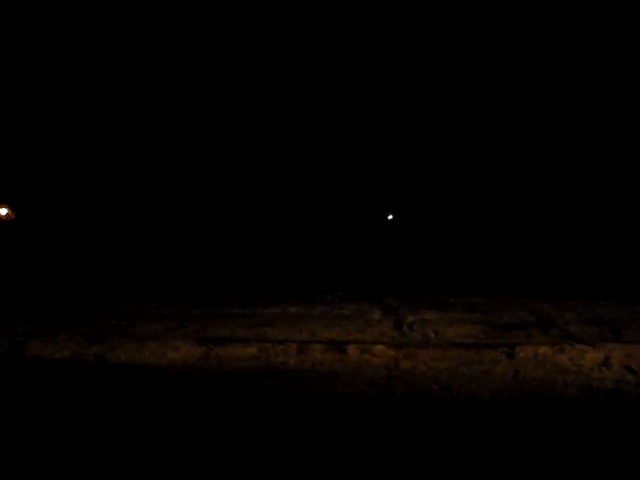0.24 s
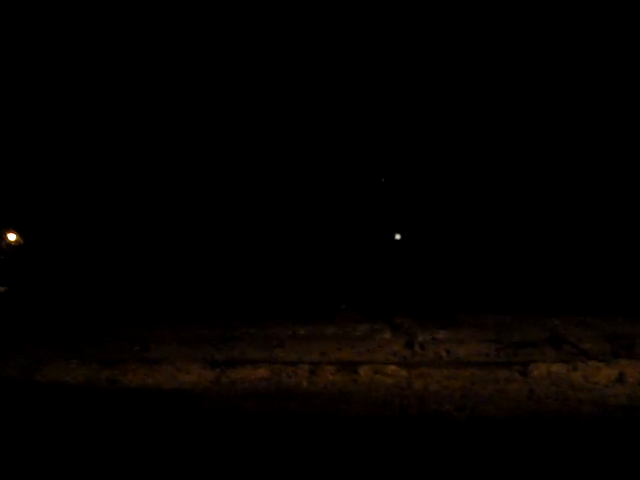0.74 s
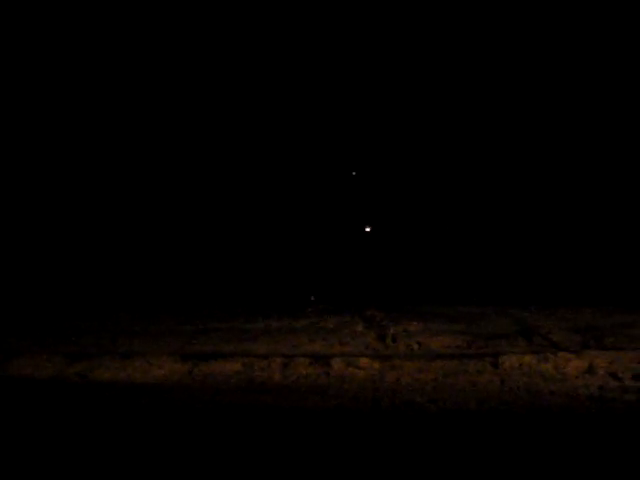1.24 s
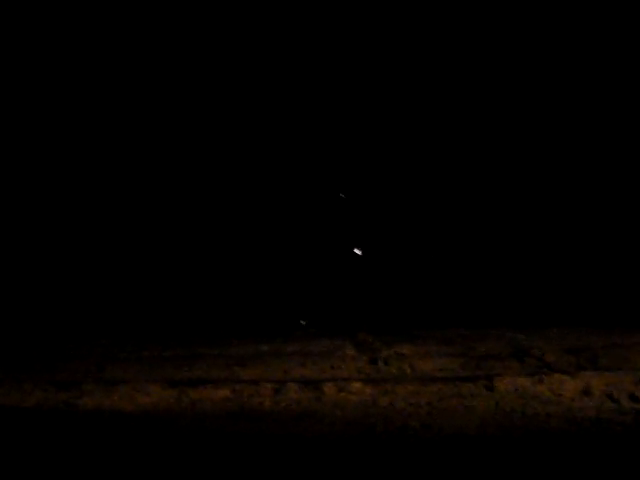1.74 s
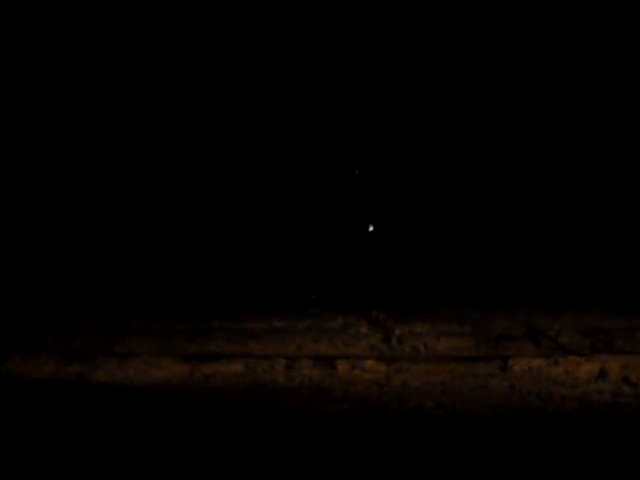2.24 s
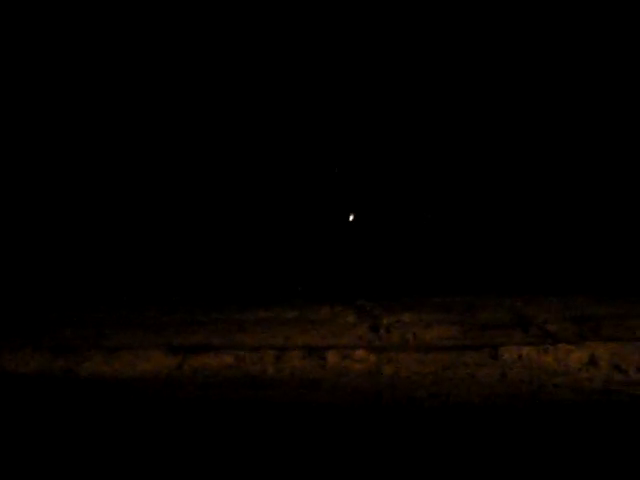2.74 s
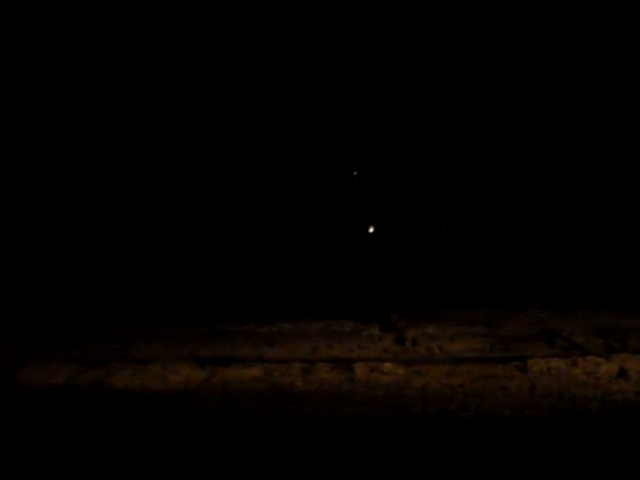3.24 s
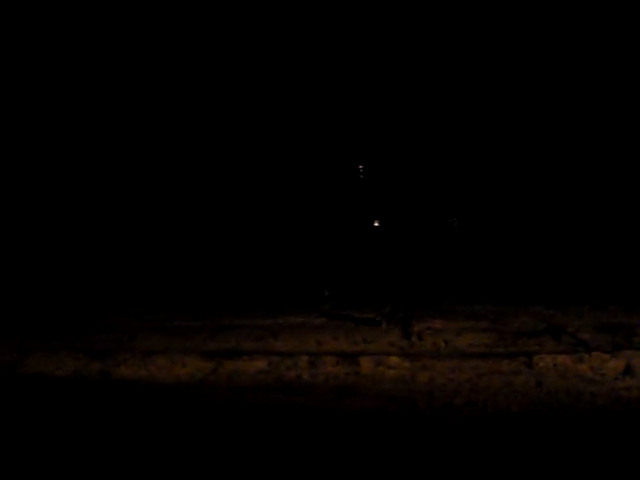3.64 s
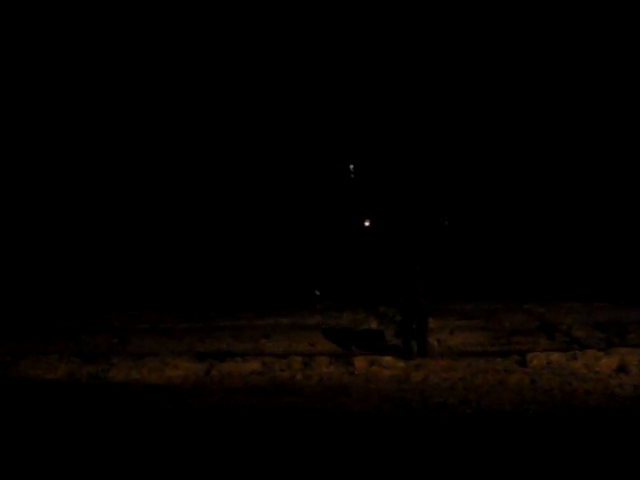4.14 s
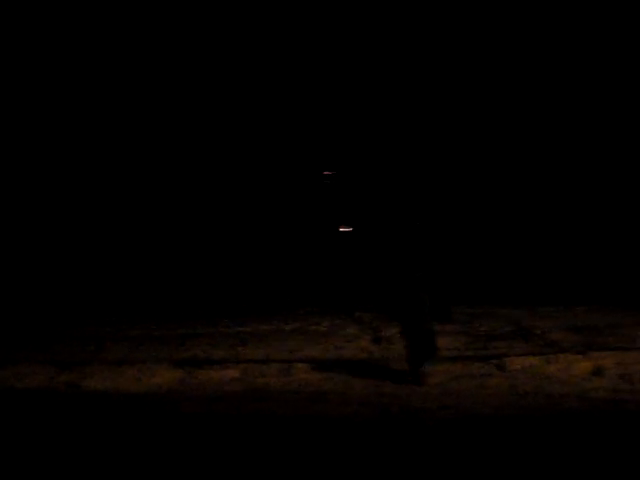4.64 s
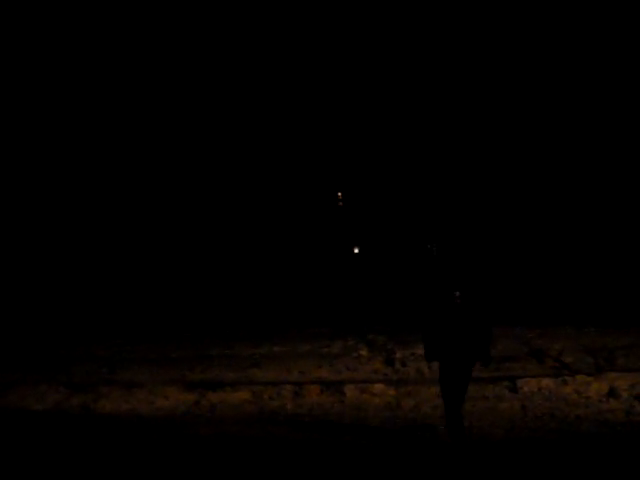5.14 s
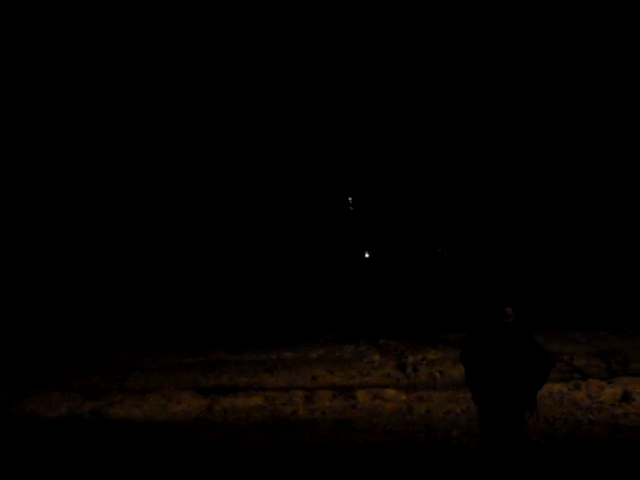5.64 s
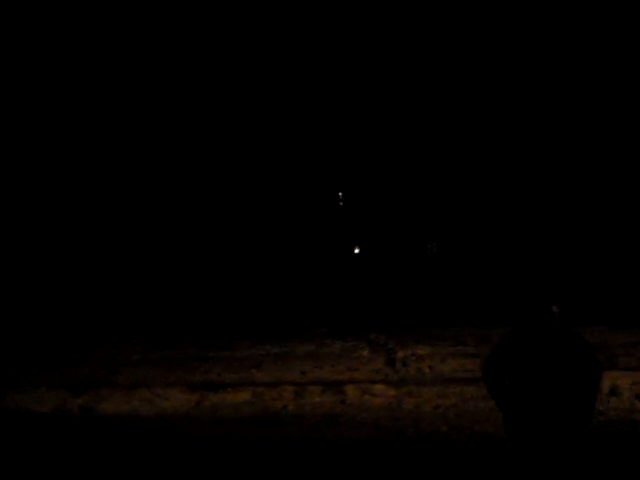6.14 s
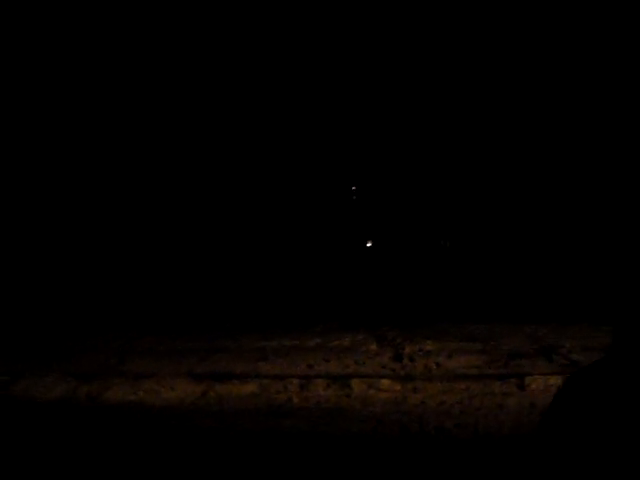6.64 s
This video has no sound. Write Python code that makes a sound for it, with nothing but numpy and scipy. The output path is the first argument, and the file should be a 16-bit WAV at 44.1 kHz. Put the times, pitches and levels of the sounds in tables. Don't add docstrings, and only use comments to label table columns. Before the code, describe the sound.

Five firework bangs roll between walls at night, with whooshing launches, faint insects, and someone's gritty footsteps coming closer.

```python
import sys
import numpy as np
from scipy import signal
from scipy.fft import rfft, irfft, next_fast_len
from scipy.io import wavfile
from scipy.ndimage import uniform_filter1d, minimum_filter1d

SR = 44100
rng = np.random.default_rng(int(sys.argv[2]) if len(sys.argv) > 2 else 0)


def generate_wav(signal):
    frames = np.transpose(np.atleast_2d(signal))
    scaled = np.clip(frames, -1, 1) * 32767
    pcm = np.round(scaled).astype(np.int16)
    wavfile.write(sys.argv[1], SR, pcm)


def makeup_ratio(level_db):
    decades = np.asarray(level_db, float) / 20
    return 10 ** decades


N = 303620


def rms_one(x):
    return x / np.sqrt(np.mean(x ** 2) + 1e-20)


def colour(x, spectrum):
    size = next_fast_len(N + 8192)
    hz, level_db = np.transpose(spectrum)
    log_hz = np.log(np.fft.rfftfreq(size, 1 / SR) + 1)
    log_gain = np.interp(log_hz, np.log(hz), level_db) * np.log(10) / 20
    cepstrum = irfft(log_gain, size)
    cepstrum[1:size // 2] *= 2
    cepstrum[size // 2 + 1:] = 0
    response = np.exp(rfft(cepstrum))
    return rms_one(irfft(rfft(x, size) * response, size)[:N])


def band(x, low_hz, high_hz):
    return signal.sosfilt(signal.butter(2, [low_hz, high_hz], "band", fs=SR, output="sos"), x + 1e-18)


def lowpass(x, top_hz):
    return signal.sosfilt(signal.butter(6, top_hz, fs=SR, output="sos"), x)


def narrow(hz, width_hz):
    return rms_one(band(rng.standard_normal(N), hz - width_hz / 2, hz + width_hz / 2))


def drift(rate_hz):
    r = np.exp(-2 * np.pi * rate_hz / SR)
    return rms_one(signal.lfilter([1], [1, -2 * r, r * r], rng.standard_normal(N + SR))[SR:])


def grains(per_s, spread_db):
    sizes = makeup_ratio(spread_db * np.minimum(rng.exponential(1, N), 4)) * rng.choice([-1, 1], N)
    return sizes * (rng.random(N) < per_s / SR)


def add(out, s, sound):
    at = int(s * SR)
    out[at:at + len(sound)] += sound[:N - at]


def thump(hz, t60, rise_s, order=1):
    t = np.arange(6000) / SR
    swell = (1 - np.exp(-t / rise_s)) ** 2
    wave = -np.sin(2 * np.pi * hz * t) * swell * makeup_ratio(-60 * (t / t60) ** order)
    wave = band(wave, hz / 4, min(hz * 5, 9000))
    return wave / np.abs(wave).max()


def swells(rows, floor_db=-120):
    t = np.arange(0, N + 32, 32) / SR
    s, level_db, rise, fall = (c[:, None] for c in np.transpose(rows))
    away = np.where(t < s, (s - t) / np.abs(rise), (t - s) / np.abs(fall))
    power = np.sum(makeup_ratio(level_db - 20 * away) ** 2, axis=0) + makeup_ratio(floor_db) ** 2
    return np.interp(np.arange(N) / SR, t, np.sqrt(power))


# (frequency [Hz], density [dB per Hz])
AIR_SPECTRUM = [(15, -50), (25, -25), (93, -24.5), (225, 5), (600, -2.5), (1400, -6), (2300, -12),
                (4100, -17), (7700, -19), (9600, -24.5), (10300, -41.5), (13500, -76)]
# (frequency [Hz], width [Hz], level [dB])
MACHINERY = [(63, 32, -67.5), (126.5, 31, -59)]


def town():
    air = makeup_ratio(-48 + .9 * drift(24)) * colour(rng.standard_normal(N), AIR_SPECTRUM)
    return air + sum(makeup_ratio(level_db) * narrow(hz, width_hz) for hz, width_hz, level_db in MACHINERY)


# (frequency [Hz], level [dB])
STEADY_SINGERS = [(7590, 3), (7560, -1)]


def far_chorus():
    t = np.arange(N) / SR
    haze = narrow(7578, 110)
    singers = sum(makeup_ratio(line_db) * np.sin(2 * np.pi * hz * t + .7 * drift(2)) for hz, line_db in STEADY_SINGERS)
    fade_db = 4.7 * np.clip(t - 4.8, 0, 2)
    return makeup_ratio(-72 + 0.48 * drift(3.2) - fade_db) * (haze + singers)


# (loudest time [s], level [dB], rise [s], fall [s])
HIGH_SINGER = [
    (3.0, -71, .8, 2.7),
    (3.72, -57, .15, .12),
    (4.17, -59, .03, 0.15),
    (4.9, -72, 2.1, 2.5),
]
# (time [s], length [s], level [dB], frequency [Hz])
NEAR_CHIRPS = [
    (5.715, .044, -52.5, 3645),
    (5.715, .044, -66, 8330),
    (6.838, .038, -41, 3645),
    (6.826, .036, -45, 8330),
]


def near_insects():
    out = swells(HIGH_SINGER) * makeup_ratio(3 * drift(13)) * narrow(9800, 500)
    for s, length, level_db, hz in NEAR_CHIRPS:
        t = np.arange(int(length * SR)) / SR
        envelope = np.sqrt(np.sin(np.pi * t / length))
        add(out, s, makeup_ratio(level_db) * envelope * np.sin(2 * np.pi * hz * t))
    return out


# (time [s], level [dB])
HANDLING = [(6.4, -69), (6.452, -54), (6.562, -45), (6.638, -50), (6.756, -53), (6.778, -39), (6.85, -46),
            (6.88, -43)]


def handling():
    s, level_db = np.transpose(HANDLING)
    gain = makeup_ratio(np.interp(np.arange(N) / SR, s, level_db, -120, -120))
    return gain * rms_one(band(grains(110, 3.0), 25, 200))


# (time [s], peak level [dB], frequency [Hz], t60 [s])
HEELS = [(1.341, -39, 352, 0.021), (1.7161, -27.5, 510, 0.008), (2.237, -33, 150, 0.01),
         (2.315, -25, 262, 0.022), (2.331, -23.5, 227, 0.12), (3.3, -28, 210, 0.021),
         (3.314, -29.5, 260, 0.033), (4.053, -24, 216, 0.032), (4.2923, -20, 370, 0.0055),
         (4.311, -23.5, 394, 0.016), (4.641, -25, 304, 0.0026), (4.817, -38.5, 137, 0.093),
         (5.182, -38, 246, 0.061), (5.596, -28.5, 201, 0.018), (5.9197, -21.5, 221, 0.038),
         (5.9212, -18.5, 1550, 0.014), (5.9397, -26, 325, 0.014), (5.9565, -25, 840, 0.011),
         (6.191, -29, 400, 0.015), (6.207, -25, 1500, 0.0052), (6.2272, -26, 337, 0.011),
         (6.233, -22, 1050, 0.0038), (6.242, -26, 450, 0.0037), (6.256, -26.5, 980, 0.013),
         (6.452, -34.5, 85, 0.14), (6.522, -26, 313, 0.011), (6.629, -26.5, 121, 0.013),
         (6.695, -35, 100, 0.025), (6.842, -29, 165, 0.022), (6.850, -33, 110, 0.025)]
# (time [s], peak level [dB], frequency [Hz], t60 [s])
KICKED_PEBBLE = [
    (6.4093, -31, 4350, .012),
    (6.4097, -35, 3750, .01),
    (6.428, -40, 4300, .014),
]
# (frequency [Hz], density [dB per Hz])
GRIT_SPECTRUM = [(1530, -41), (2600, -10.5), (3700, -10), (3970, -14), (6320, -11.5), (7690, -13),
                 (8390, -12), (9760, -10.5), (10400, -24.5), (13500, -52), (22000, -120)]
# (loudest time [s], hiss level [dB], rise [s], fall [s])
BRUSHES = [(.19, -68, .03, .15), (1.652, -46.5, 0.011, 0.081), (1.69, -49, .02, 0.1),
           (1.79, -58, 0.05, 0.13), (1.92, -61.5, 0.19, 0.062), (3.55, -57, .02, .045),
           (3.646, -40.5, 0.029, 0.065), (3.746, -46.5, 0.09, 0.11), (3.972, -70, .08, .015),
           (4.06, -47.5, 0.035, 0.013), (4.17, -53, 0.026, 0.19), (4.394, -45, 0.036, 0.08),
           (4.578, -53, 0.28, 0.055), (4.69, -57, 0.0079, 0.7), (4.854, -60, 0.12, 0.069),
           (4.924, -45.5, 0.03, 0.39), (5.03, -52, 0.087, 0.074), (5.34, -47, 0.0072, 0.094),
           (5.444, -51, 0.075, 0.16), (5.57, -46, 0.024, 0.36), (5.66, -44, 0.24, 0.03),
           (5.68, -57, 0.022, 0.39), (6.078, -46, .01, 0.12), (6.37, -45.5, 0.14, 0.13),
           (6.69, -43, 0.051, 0.12), (6.848, -60, 0.052, 0.014)]
# (loudest time [s], hiss level [dB], rise [s], fall [s])
HEAVY_DRAGS = [(.12, -57.5, 4.5, 0.05), (.77, -64, 0.13, 1.5), (1.1, -70, 1.2, 0.035),
               (4.67, -47.5, 0.11, 0.031), (5.29, -38, 0.0036, 0.063), (5.322, -33.5, 0.015, 0.0056),
               (5.895, -39.5, 0.0086, 0.13), (6.234, -41, 0.045, 0.01), (6.245, -47.5, 0.07, 0.068),
               (6.476, -46.5, 0.0041, 0.28), (6.564, -43, 0.11, 0.037), (6.774, -45, .004, .02),
               (6.781, -32, .004, 0.018), (6.8, -41.5, .02, 0.025), (6.84, -40, 0.12, 0.1)]
# (loudest time [s], level [dB], rise [s], fall [s], frequency [Hz])
STONE_GRINDS = [(5.9, -44.5, 0.018, .02, 1740), (5.942, -35, 0.0046, 0.028, 1470),
                (6.212, -41, .01, .03, 1520), (6.495, -39, 0.014, 0.05, 1800),
                (6.773, -25.5, 0.0056, 0.018, 1760), (6.781, -42, 0.0067, .015, 2060),
                (6.801, -28.5, 0.02, .025, 2020), (6.828, -48, 0.027, .03, 1900)]
# (loudest time [s], level [dB], rise [s],
# fall [s])
COARSE_CRUNCHES = [(.297, -33, 0.014, 0.029), (1.62, -48, 0.055, 0.093), (4.07, -50.5, .02, 0.062),
                   (6.215, -48, 0.11, 0.059), (6.49, -51, 0.011, 0.12)]


def footsteps():
    out = np.zeros(N)
    for s, peak_db, hz, t60 in [*HEELS, *KICKED_PEBBLE]:
        add(out, s, makeup_ratio(peak_db) * thump(hz, t60, .0004))
    grit = grains(1500 * makeup_ratio(5.0 * drift(60)), 2.1) + 0.1 * rng.standard_normal(N)
    hiss = colour(grit, GRIT_SPECTRUM)
    rasp = rms_one(band(grit, 580, 3100))
    for strokes, rasp_db in (BRUSHES, -5), (HEAVY_DRAGS, 1.5):
        out += swells(strokes) * (hiss + makeup_ratio(rasp_db) * rasp)
    chips = grains(1200, 4.0)
    spread = 1.14
    for *stroke, hz in STONE_GRINDS:
        out += swells([stroke]) * rms_one(band(chips, hz / spread, hz * spread))
    gravel = rms_one(band(band(grains(410, 2.4), 1100, 3200), 1000, 5500))
    return out + swells(COARSE_CRUNCHES) * gravel


# (time [s], peak level [dB], weight below 2 kHz [dB])
SHARP_STONES = [(1.1653, -43, 3), (1.3229, -28, -10), (1.3418, -29, -1), (1.5509, -27, -9),
                (1.5878, -27, -14), (1.5998, -28, -5), (1.6072, -21, -12), (1.6127, -28, -2),
                (1.6248, -20, -6), (1.6348, -24, -13), (1.6376, -29, -8), (1.6425, -25, -9),
                (1.6514, -38, -2), (1.8776, -34, -9), (1.9224, -42, -3), (4.6693, -31, -7),
                (5.5582, -37, -3), (5.5647, -35, -4), (5.6214, -32, -7), (5.7712, -39, -4),
                (5.8825, -33, -8), (5.9028, -35, -4), (5.909, -34, -4), (5.9204, -27, 0), (5.9408, -37, -2),
                (5.9564, -38, 3), (6.0766, -37, -8), (6.0985, -37, -9), (6.191, -36, 0), (6.2267, -29, -2),
                (6.2295, -29, -2), (6.2444, -34, 2), (6.3684, -36, -10), (6.4762, -33, -1),
                (6.4905, -36, 4), (6.4955, -36, 4), (6.543, -40, 4), (6.6977, -29, -7), (6.7074, -32, 2),
                (6.7555, -39, 4), (6.7735, -31, -2), (6.7795, -28, -4), (6.8012, -33, -2),
                (6.8035, -34, -2)]
# (time [s], peak level [dB], weight below 2 kHz [dB])
BLUNT_STONES = [(1.5675, -38, -6), (2.9208, -34, -8), (2.9274, -38, -2), (3.2061, -39, -5),
                (4.0547, -33, -2)]


def snaps():
    out, t = np.zeros(N), np.arange(600) / SR
    # weight above 6 kHz [dB], highest frequency [Hz]
    stones = [(*row, -8, 10000) for row in SHARP_STONES] + [(*row, -30, 5700) for row in BLUNT_STONES]
    fuzzes = rng.standard_normal((len(stones), 600))
    for (s, peak_db, heavy_db, fine_db, top_hz), noise in zip(stones, fuzzes):
        fuzz = .07 * noise * np.exp(-np.abs(t - .002) / .0012)
        click = lowpass(fuzz + (t == t[88]), top_hz)
        parts = band(click, 2300, 6000), band(click, 800, 2300), band(click, 6000, 10000)
        sharp, heavy, fine = (part / np.abs(part).max() for part in parts)
        stone = sharp - makeup_ratio(heavy_db + 5) * heavy - makeup_ratio(fine_db + 6) * fine
        add(out, s - .0009, makeup_ratio(peak_db + 1) * stone)
    return out


# (loudest time [s], level [dB], rise [s], fall [s])
SPENT_FIZZ = [
    (1.0, -60, 0.86, .3),
]


def fizz():
    return swells(SPENT_FIZZ) * narrow(6800, 1700)


# (time [s], climb to loudest [s], rush level [dB], jet level [dB], lift-off boom level [dB])
LIFT_OFFS = [
    (.26, 0.14, -28.5, -36.5, -43),
    (2.36, 0.11, -30, -39.5, -39),
    (3.40, 0.13, -30.5, -39, -54.5),
    (4.93, 0.12, -30.5, -40.5, -50),
]
# (time [s], roll level [dB], boom level [dB], far-wall echo level [dB], highest surviving frequency [Hz])
STREET_BLASTS = [
    (0.103, -34, -51, -45, 3670),
    (.68, -31, -33, -36, 9800),
    (2.74, -33, -36.5, -35.5, 4170),
    (3.799, -31.5, -40, -41, 3750),
    (5.32, -33.5, -43, -40.5, 9500),
]


def street_swells():
    body, top, boom = [], [], []
    for s, climb, rush_db, jet_db, boom_db in LIFT_OFFS:
        body.append((s + climb, rush_db, 0.22, 0.68))
        top.append((s + 0.71 * climb, jet_db, 0.15, 0.64))
        boom.append((s, boom_db, 0.13, 0.25))
    jet = list(top)
    gather_s, rise_s, bright_db = 0.056, 0.063, -12
    for s, roll_db, boom_db, far_db, _ in STREET_BLASTS:
        full, late, near = s + gather_s, s + 0.353, s + 0.082
        linger_db, near_db = roll_db - 8.5, roll_db - 0.5
        body += [(full, roll_db, rise_s, 0.54), (full, linger_db, rise_s, 2.7),
                 (late, far_db, 0.1, 0.18), (near, near_db, 0.037, 0.13)]
        top += [(full, roll_db + bright_db, rise_s, 0.43), (full, linger_db - 15.5, rise_s, 2.7),
                (late, far_db + bright_db, 0.1, 0.18), (near, near_db + bright_db, 0.037, 0.13)]
        boom.append((s, boom_db, rise_s, 0.29))
    woken = STREET_BLASTS[0][0] + gather_s
    murmurs = (body, -51.5), (top, -66), (boom, -58), (jet, -120)
    return [swells(rows + [(woken, town_db, rise_s, 200)]) for rows, town_db in murmurs]


# (frequency [Hz], density [dB per Hz])
ROLL_BODY_SPECTRUM = [(150, -24.5), (250, -4), (323, -2), (398, -1.5), (432, 1), (688, 2), (915, -3.5),
                      (1070, -4), (1500, -10.5), (1950, -32.5), (3300, -120)]
ROLL_TOP_SPECTRUM = [(650, -17.5), (1100, -25), (1220, -18.5), (1570, 1), (1870, -1), (2770, -8),
                     (5500, -30), (7150, -51), (12100, -120)]
# (loudest time [s], level [dB], rise [s], fall [s])
ALLEY_DRONE = [
    (.13, -29.5, 0.056, 0.17),
    (.39, -37.5, 0.14, 0.18),
]


def roll():
    body_gain, top_gain, boom_gain, jet_gain = street_swells()
    sparks = makeup_ratio(-18) * jet_gain * rms_one(band(grains(3700, 4.3), 4000, 5000))
    arrivals = grains(1300, 1.15) * makeup_ratio(0.35 * drift(35) + 1.1 * drift(18.6))
    body = makeup_ratio(2.0) * body_gain * colour(arrivals, ROLL_BODY_SPECTRUM)
    top = makeup_ratio(1.5) * top_gain * colour(arrivals + 0.5 * grains(5000, 2.1), ROLL_TOP_SPECTRUM)
    boom = makeup_ratio(-1.0) * boom_gain * rms_one(band(band(arrivals, 143, 238), 121, 310))
    return sparks + body + top + boom + swells(ALLEY_DRONE) * narrow(325, 64)


# (time [s], peak level [dB], ring [Hz], crack level [dB], ring t60 [s])
BURST_ARRIVALS = [(.0992, -13, 700, -17, .006), (.1009, -11, 800, -16, .011), (.1004, -16, 1440, -10, .009),
                  (.1051, -16, 800, -14, .01), (.1068, -16, 1300, -12, .01), (.1118, -18, 620, -14, .014),
                  (.6627, -2.5, 610, -17, .013), (.6771, -5.5, 450, -22, .015),
                  (.6845, -15, 605, -23, .016), (2.7245, -6, 620, -21, .008), (2.7392, -11, 540, -25, .008),
                  (2.7418, -4.5, 520, -27, .019), (2.7505, -14, 600, -24, .03),
                  (3.7834, -9, 640, -15, .015), (3.8006, -8.5, 600, -20, .008),
                  (3.8040, -15, 580, -25, .02), (3.8167, -12, 620, -24, .02), (3.8308, -14, 600, -25, .015),
                  (3.8405, -15, 680, -22, .015), (5.3000, -17, 900, -10, .006),
                  (5.3014, -6, 620, -16, .022), (5.3159, -8, 700, -14, .009),
                  (5.3197, -5.5, 570, -21, .014), (5.3268, -14, 600, -25, .014),
                  (5.3375, -20, 620, -16, .02)]
# (time [s], peak level [dB], ring [Hz])
CLEAR_RETURNS = [(.1505, -20, 650), (.192, -20, 1050), (0.292, -18, 1020), (0.361, -15, 595),
                 (.4265, -16, 600), (0.4598, -11, 600), (0.4765, -12, 480), (.485, -15, 600),
                 (0.525, -15, 700), (1.022, -23, 740), (2.485, -18, 487), (2.52, -18, 563),
                 (2.572, -20, 703), (2.799, -18, 476), (2.826, -16, 425), (2.891, -20, 528),
                 (3.079, -21, 608), (3.367, -29, 606), (3.452, -21, 557), (3.49, -20, 571),
                 (3.541, -14, 560), (3.55, -16, 619), (3.589, -21, 568), (3.847, -17, 401),
                 (3.871, -17, 487), (3.889, -17, 447), (3.915, -19, 659), (3.934, -19, 670),
                 (4.158, -25, 673), (4.927, -28, 659), (4.955, -21, 670), (5.0, -26, 799),
                 (5.047, -20, 541), (5.409, -19, 713)]
# (time [s], peak level [dB], frequency [Hz], t60 [s])
PRESSURE_PUSHES = [
    (.1, -28, 108, 0.09),
    (0.661, -18, 33, 0.016),
    (.19, -41, 103, 0.072),
    (.32, -27.5, 200, 0.019),
    (5.305, -23.5, 218, 0.28),
]


def bursts():
    out, struck = np.zeros(N), np.zeros(N)
    t = np.arange(6000) / SR
    cracks = rng.standard_normal((len(BURST_ARRIVALS), 6000))
    for (s, peak_db, hz, crack_db, t60), noise in zip(BURST_ARRIVALS, cracks):
        puff = noise * makeup_ratio(-60 * t / 0.031) * (1 - np.exp(-t / 0.0001))
        crack = band(band(band(puff, 640, 2230), 680, 5600), 500, 4800)
        crack += makeup_ratio(crack_db - 6) * band(puff, 2700, 7900)
        top_hz = min(STREET_BLASTS, key=lambda blast: abs(blast[0] - s))[4]
        pulse = thump(hz, t60, .0007, order=2) + makeup_ratio(crack_db + 12.5) * crack
        add(out, s, makeup_ratio(peak_db) * lowpass(pulse, top_hz))
        add(struck, s + 0.0013, makeup_ratio(peak_db) * np.ones(1))
    for s, peak_db, hz in CLEAR_RETURNS:
        add(out, s, makeup_ratio(peak_db - 1.5) * thump(hz, 0.023, 0.00026))
    for s, peak_db, hz, t60 in PRESSURE_PUSHES:
        add(out, s, makeup_ratio(peak_db) * thump(hz, t60, 0.0011))
    fade = makeup_ratio(-60 / (.22 * SR))
    trail = uniform_filter1d(signal.lfilter([1], [1, -fade], struck + 1e-18), size=300)
    returns = grains(2200, 3.0)
    scatter = makeup_ratio(-22) * colour(returns, ROLL_BODY_SPECTRUM)
    scatter += makeup_ratio(-30) * rms_one(band(returns, 890, 1380))
    scatter += makeup_ratio(-35.5) * colour(returns, ROLL_TOP_SPECTRUM)
    return out + trail * scatter


def scene():
    background = town() + far_chorus() + near_insects() + handling()
    walker = footsteps() + snaps()
    rockets = fizz() + roll() + bursts()
    return (background + walker + rockets)[None]


def thin_treble(x):
    hz, s, cells = signal.stft(x, SR, nperseg=256)
    sharp_db = 10 * np.log10(np.mean(np.abs(cells[0, hz > 4000]) ** 2, axis=0) + 1e-18)
    jump_db = -minimum_filter1d(-sharp_db, size=12, origin=-2) - sharp_db
    least_jump_db = 12
    low_hz = np.maximum(6000 - 400 * (jump_db - least_jump_db), 3000)
    keep = np.where((jump_db > least_jump_db) & (hz[:, None] > low_hz), .04, 1)
    treble = uniform_filter1d(np.abs(cells[0, hz > 5000]).mean(axis=0), size=25)
    odds = np.where(treble > 1.5 * np.median(treble), 0.25, 0.06)[::4]
    lost = rng.random((len(hz) // 5 + 1, len(odds))) < odds
    lost = np.kron(lost, np.ones((5, 4)))[:len(hz), :len(s)]
    lost = lost * (hz[:, None] > 4300) * (sharp_db < np.median(sharp_db) + 14)
    return signal.istft(cells * keep * (1 - .98 * lost), SR, nperseg=256)[1][..., :N]


def low_pass(x):
    return signal.sosfilt(signal.butter(12, 11330, fs=SR, output="sos"), x)


def record(dry):
    heard = signal.sosfilt(signal.butter(2, 45, "high", fs=SR, output="sos"), dry)
    soft = 1.147 * np.tanh(heard / 1.26)
    cut = signal.sosfilt(signal.cheby2(30, 50, 10260, fs=SR, output="sos"), soft)
    mix = thin_treble(cut)
    return low_pass(mix)


dry = scene()
out = record(dry)
generate_wav(out)
```